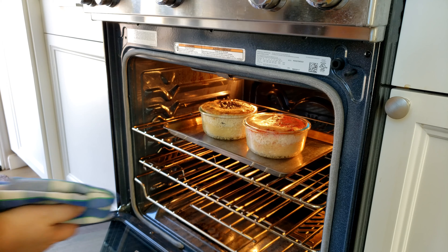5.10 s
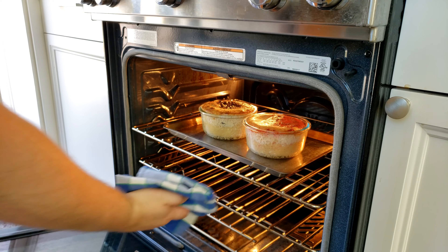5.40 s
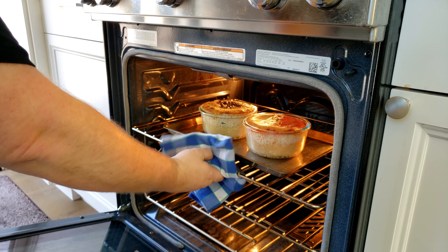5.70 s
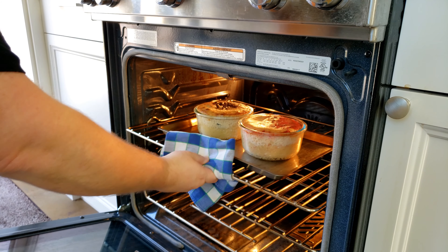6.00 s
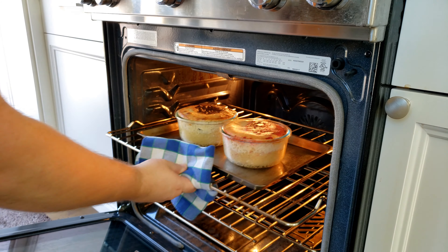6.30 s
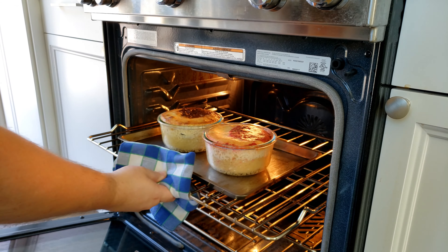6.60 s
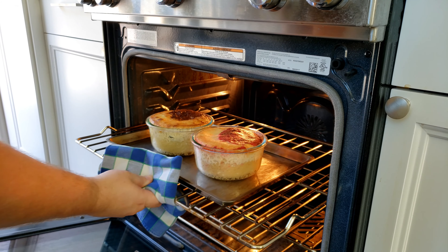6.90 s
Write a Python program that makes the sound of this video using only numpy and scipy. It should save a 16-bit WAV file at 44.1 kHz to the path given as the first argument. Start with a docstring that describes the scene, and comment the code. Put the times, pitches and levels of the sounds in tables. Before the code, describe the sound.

An open oven hums and whirrs quietly throughout in a hard-walled kitchen with a short echo, over a low room rumble and a faint rustle of cloth. From about 0.3 seconds someone walks unevenly on a wooden floor: boards knock, soles slap and the floor thuds, most heavily near 1.1 and 1.9 seconds. Small things tick now and then, and loose metal rattles briefly at 1 second. At 2.75 seconds a hard object is set down with a sharp, hollow clack. More steps follow until about 4.6 seconds, with a few crisp ticks around 3.5. The rumble swells slightly, and a very faint thin whine rises and fades near 5 seconds. From 5.9 seconds the loaded wire rack is drawn out, scraping and ringing along its rails, loudest between 6 and 6.3. The sheet pan squeals briefly at 6.8 seconds, and the scrape eases off just after 7.

```python
"""An open oven hums and whirrs in a bright, hard-walled kitchen, over a low rumble in the room and a
faint rustle of cloth. Someone walks about on the wooden floor: small things tick, boards knock, soles
slap, loose metal rattles and the floor thuds. Near 2.75 s something is set down with a clack. The
rumble swells with the later steps, and a thin whine rises and fades. From 5.86 s a hand draws out the
wire rack, which scrapes along its rails under a sheet pan and two glass dishes; the pan squeals briefly."""
import sys
import numpy as np
from scipy import signal
from scipy.fft import rfft, irfft
from scipy.io import wavfile

SR = 44100
rng = np.random.default_rng(int(sys.argv[2]) if len(sys.argv) > 2 else 0)


def put_to_file(sound):
    """Save the sound as 16-bit audio at rate SR, in the file named by the first command-line argument."""
    columns = np.atleast_2d(sound).T  # one column per channel
    safe = np.clip(columns, -1, 1)
    whole_steps = np.round(safe * 32767)
    wavfile.write(sys.argv[1], SR, whole_steps.astype(np.int16))


N = 315315
TIME = np.arange(N) / SR
FREQ = np.arange(N // 2 + 1) * SR / N + 1e-3
# The borders of the bass, lower middle, upper middle and treble bands, in Hz.
BAND_EDGES = [20, 450, 1200, 4500, 20000]


def undb(db):
    """Turn decibels into a number to multiply by."""
    return 10 ** (np.asarray(db) / 20)


def unit(x):
    """Scale a sound to an average strength (rms) of 1."""
    return x / np.sqrt(np.mean(x ** 2))


def over_time(table):
    """Join rows that start with a time by straight lines: one curve for each further column."""
    times, *columns = np.transpose(table)
    return [np.interp(TIME, times, column) for column in columns]


def over_pitch(points, hz=FREQ):
    """Join (Hz, value) points by straight lines, giving every octave the same room."""
    point_hz, values = np.transpose(points)
    return np.interp(np.log(hz), np.log(point_hz), values)


def shape(x, gain):
    """Filter a sound with one gain for each frequency."""
    return irfft(rfft(x) * gain, N)


def split(x, colour, edges=BAND_EDGES):
    """Give a sound its tone colour and cut it into bands of equal strength."""
    spectrum = rfft(x) * undb(over_pitch(colour))
    bands = [1 / np.sqrt((1 + (lo / FREQ) ** 12) * (1 + (FREQ / hi) ** 12))
             for lo, hi in zip(edges, edges[1:])]
    return [unit(irfft(spectrum * band, N)) for band in bands]


def noise():
    """Two rows of noise: mid (what left and right share) and side (how they differ)."""
    return rng.standard_normal((2, N))


def coloured_noise(colour):
    """Noise with a tone colour given as (Hz, dB) points."""
    return unit(shape(noise(), undb(over_pitch(colour))))


def narrow_noise(hz, width_hz):
    """Noise gathered around one frequency."""
    return unit(shape(noise(), 1 / (1 + ((FREQ - hz) / width_hz) ** 2)))


def grains(per_second, spread_db):
    """A crowd of tiny contacts of uneven size."""
    contacts = noise() * (rng.random(N) < per_second / SR)
    return contacts * undb(spread_db * np.minimum(rng.exponential(size=N), 4))


def wander(rate):
    """A smooth random curve, about 1 in size, that changes about rate times a second."""
    return unit(shape(rng.standard_normal(N), np.exp(-(FREQ / rate) ** 2)))


def add(track, start_s, sound):
    """Mix a short sound into a track."""
    i = max(int(start_s * SR), 0)
    track[..., i:i + sound.shape[-1]] += sound[..., :N - i]


def blows(times, levels_db, fades_s, rise_s):
    """The loudness curve of hits that build up quickly and die away."""
    out, t = np.zeros(N), TIME[:SR // 2]
    for start, db, fade in zip(times, levels_db, fades_s):
        add(out, start, undb(db) * (1 - np.exp(-t / rise_s)) * np.exp(-t / fade))
    return out


def strikes(times, levels_db):
    """Single sharp hits, each reaching the side row a few samples late."""
    out = np.zeros((2, N))
    for start, db in zip(times, levels_db):
        add(out[0], start, undb([db]))
        add(out[1], start + rng.integers(4, 12) / SR, undb([db]))
    return out


def ring(modes):
    """One second of fading tones; a tone's ring time is how long it takes to drop 60 dB."""
    t = TIME[:SR]
    return sum(undb(db) * np.sin(2 * np.pi * hz * t) * np.exp(-np.log(1000) * t / ring_s)
               for hz, db, ring_s in modes)


def resonances(modes):
    """Filter gains for an object that favours certain pitches."""
    return sum(undb(db) / (1 + 1j * (FREQ ** 2 - hz ** 2) / (FREQ * width)) for hz, width, db in modes)


def follow(control_db, slope):
    """A gain that is 1 at a curve's peak and loses slope dB for each dB below it."""
    return undb(slope * (control_db - control_db.max()))


def landings(rows, colour, rise_s, band_db):
    """A shoe lands as a crowd of tiny hits, with its own loudness in each of the four bands."""
    times, level, bass, treble, fades = np.transpose(rows)[:5]
    levels = bass, level, level + 0.55 * treble, level + treble
    bands = split(grains(9000, spread_db=1.2), colour)
    return sum(band * blows(times, db + trim, fades, rise_s)
               for band, db, trim in zip(bands, levels, band_db))


def oven(mains_hz=120, steady_tone=0.68):
    """The oven gives a mains hum, the fan's wavering whirr and a thin hiss."""
    # How loud the hum and the fan are. Each row: time in seconds, level in dB.
    hum_levels = [(0.0, -53.5), (0.84, -62.5), (1.23, -49), (1.43, -56), (5.34, -48), (5.87, -53),
                  (7.15, -45.5)]
    whirr_levels = [(0, -64.5), (.7, -63.5), (1.45, -76), (2.9, -85), (3.9, -61), (4.2, -62.5), (5.62, -56),
                    (5.85, -68)]
    # The fan's note. Each row: time in seconds, pitch in Hz.
    whirr_pitches = [(2.5, 850), (3.9, 900), (4.6, 883.6), (5.3, 821), (6.4, 863)]
    # The hiss's tone colour. Each row: frequency in Hz, level in dB.
    hiss_colour = [(700, -38), (1300, -12), (2000, -16), (4500, -22), (6000, 6), (7500, -8), (9000, -44),
                   (10800, 11), (12300, -3), (14000, -8.5), (16000, -17)]
    mains_phase = 2 * np.pi * mains_hz * TIME
    hum = unit(np.sin(mains_phase) + undb(-15) * np.sin(2 * mains_phase))
    hum *= undb(over_time(hum_levels)[0] + 2 + 1.5 * wander(6))
    flutter = steady_tone + narrow_noise(0, width_hz=41)
    fan_phase = 2 * np.pi * np.cumsum(over_time(whirr_pitches)[0]) / SR
    whirr = unit(flutter * np.sin(fan_phase)) * undb(over_time(whirr_levels)[0])
    hiss = coloured_noise(hiss_colour) * undb(-69.5)
    return hum * np.array([[1], [0.6]]) + whirr + hiss


def room_rumble():
    """A low rumble in the room, which swells with the footsteps around 3.9 to 4.6 s."""
    # How loud the rumble is. Each row: time in seconds, level in dB.
    levels = [(0, -47), (.7, -53.5), (1.45, -53), (2.9, -51), (3.9, -46), (4.6, -45.5), (5.2, -49),
              (7.15, -46.5)]
    # Its tone colour. Each row: frequency in Hz, level in dB.
    colour = [(20, -40), (30, -28), (45, -1.5), (70, -7), (125, -7.5), (160, -14), (200, -22), (290, -17),
              (450, -26), (650, -27.5), (880, -25.5), (1050, -36.5), (1500, -52.5), (3000, -67)]
    return coloured_noise(colour) * undb(over_time(levels)[0] + wander(13))


def cloth():
    """Fibres rub: a faint, flickering rustle with a swish at each larger movement."""
    # The cloth's tone colour. Each row: frequency in Hz, level in dB.
    colour = [(710, 22), (1200, -7), (2110, -11.5), (2830, -11), (3150, -13), (4600, -13), (5710, -6),
              (7020, -3), (8440, -6.5), (15200, 1), (16000, -4.5)]
    # The faint rustle. Each row: time in seconds, level in dB.
    rustle_levels = [(0.0, -52.5), (0.64, -61), (1.0, -58), (1.31, -65), (1.63, -70), (2.62, -59),
                     (4.26, -59), (4.51, -53.5), (5.02, -58), (5.8, -54.5)]
    # The swishes. Each row: start in seconds, treble in dB, middle in dB, seconds to the peak.
    swishes = [(0.74, -64, -56.5, .04), (0.929, -52.5, -67, 0.018), (2.265, -44.5, -56.5, 0.027),
               (2.495, -44.5, -94, 0.023), (2.817, -51, -48.5, 0.033), (3.273, -54.5, -92, 0.041),
               (3.867, -53, -52.5, .042), (4.27, -45, -53.5, 0.048), (4.43, -66, -56, 0.056),
               (4.799, -46.5, -87, 0.016), (5.01, -49.5, -77, 0.015), (5.102, -50, -68, .015),
               (5.332, -49, -71, 0.031), (5.785, -50, -58.5, 0.016)]
    middle, treble = split(grains(7000, spread_db=0.42), colour, BAND_EDGES[2:])
    rustle_db = over_time(rustle_levels)[0] - 2 + 1.46 * wander(33)
    out = (treble + undb(-17) * middle) * undb(rustle_db)
    for start, treble_db, middle_db, peak_s in swishes:
        age = np.maximum(TIME - start, 0) / peak_s
        swell = (age * np.exp(1 - age)) ** 2.3
        out += (undb(treble_db - 6) * treble + undb(middle_db - 6) * middle) * swell
    return out


def ticks():
    """Small things tick with a snap and brief chatter; the smaller, the higher their lowest tone."""
    # The ticks. Each row: start in seconds, snap in dB, chatter in dB, lowest frequency in Hz.
    events = [(0.253, -25, -41.5, 1480), (0.737, -35, -43, 1500), (2.179, -45, -47.5, 1500),
              (2.475, -29, -36.5, 5160), (3.415, -21, -46, 3000), (3.4622, -21, -29.5, 1500),
              (3.5779, -22, -38, 6000)]
    # Their tone colour. Each row: frequency in Hz, level in dB.
    colour = [(800, -40), (2000, -5), (4000, -4.5), (5400, -1), (7500, -1.5), (9000, -3), (12000, 3.5),
              (16000, 1)]
    out, hiss = np.zeros((2, N)), noise()
    for start, snap_db, chatter_db, lowest_hz in events:
        snap = strikes([start], [snap_db + 2])
        chatter = hiss * blows([start], [chatter_db + 2], fades_s=[0.005], rise_s=0.0011)
        low_cut = signal.butter(4, lowest_hz, "highpass", fs=SR, output="sos")
        out += signal.sosfilt(low_cut, snap + chatter)
    return shape(out, undb(over_pitch(colour)))


def board_knocks(ring_s=0.067):
    """Shoes knock dully on the boards, and each board rings briefly at its own pitch."""
    # The knocks. Each row: start in seconds, level in dB, bass in dB, treble in dB above the level,
    # fade in seconds, the board's pitch in Hz.
    knocks = [(0.324, -42, -42, -1, 0.053, 697), (0.34, -29, -40.5, -30, 0.016, 457),
              (0.709, -44.5, -56, -27, 0.021, 245), (0.812, -42.5, -49, 4.5, 0.02, 307),
              (0.911, -27, -31, -27, 0.015, 235), (0.996, -29, -24.5, -12.5, 0.026, 251),
              (1.872, -47, -36.5, -3, 0.072, 285), (1.93, -37, -28.5, -8, 0.037, 330),
              (2.513, -56, -46, 0.5, 0.079, 234), (2.689, -42, -65, -33, 0.028, 231),
              (3.048, -41, -36, -16, 0.034, 240), (3.087, -40.5, -54, -12.5, 0.018, 244),
              (3.41, -38, -41, -17, 0.04, 307), (3.501, -41.5, -43.5, -14.5, 0.079, 440),
              (3.702, -37.5, -37, -18, 0.034, 267), (4.367, -32.5, -49, -19, 0.016, 330.5),
              (4.64, -49, -38.5, -3, 0.025, 354), (5.745, -44.5, -48, -1.5, 0.023, 334)]
    # The boards' tone colour. Each row: frequency in Hz, level in dB.
    colour = [(100, -5), (170, -4.5), (255, 4), (350, -3.5), (450, -11), (700, -14.5), (1000, -18),
              (1400, -25), (1700, -22.5), (2750, -24.5), (3400, -31), (4300, -33), (6000, -37.5),
              (8600, -39.5), (11500, -36.5), (16000, -38)]
    out = landings(knocks, colour, rise_s=0.0043, band_db=(-2.5, -5, -10, -3))
    for start, _, bass_db, _, _, hz in knocks:
        placement = np.array([[1], [rng.uniform(-1.5, 1)]])
        add(out, start, ring([(hz, bass_db + 0.5, ring_s)]) * placement)
    return out


def sole_slaps(flat_lag_s=0.014, edge_fade_s=0.019):
    """A sole slaps down edge first, then flat, and both contacts set the boards ringing."""
    # The slaps. Each row: start in seconds, bass in dB, the edge's level and extra treble in dB,
    # the flat's level and extra treble in dB, the flat's fade in seconds.
    slaps = [(0.36, -49, -38.5, 11.5, -28, -3.5, 0.0083), (1.121, -26.5, -24.5, -5, -27, -31, 0.021),
             (1.922, -31.5, -19, -8.5, -33, -13.5, 0.081)]
    # The sole's tone colour. Each row: frequency in Hz, level in dB.
    colour = [(82, -28), (140, 7), (212, -13.5), (309, -0.5), (377, -5), (572, -0.5), (885, -2),
              (977, -6.5), (1220, -10.5), (1540, -16.5), (2850, -23), (3210, -22), (14500, -15),
              (16000, -24)]
    # The boards' tones. Each row: pitch in Hz, level in dB, ring time in seconds.
    board_tones = [(377, -7, 0.25), (591, -3.5, 0.21), (797, -33, 0.12), (1310, -25, .15)]
    contacts = []
    for start, bass_db, edge_db, edge_treble, flat_db, flat_treble, fade in slaps:
        contacts.append((start, edge_db, bass_db - 3, edge_treble, edge_fade_s))
        contacts.append((start + flat_lag_s, flat_db, bass_db, flat_treble, fade))
    smack = landings(contacts, colour, rise_s=0.0032, band_db=(-2.5, -9, -7, -2))
    times, levels_db = np.transpose(contacts)[:2]
    hits = strikes(times, levels_db - 10)
    return smack + signal.fftconvolve(hits, ring(board_tones)[None], axes=1)[:, :N]


def metal_rattle(start_s=0.99):
    """Loose metal chatters against the stove and settles."""
    # The metal's tones. Each row: pitch in Hz, width in Hz, level in dB.
    metal_tones = [(1210, 83, 0), (1766, 220, -5), (2120, 220, -5), (2680, 240, -2)]
    chatter = unit(shape(grains(4000, spread_db=1), resonances(metal_tones)))
    return chatter * blows([start_s], levels_db=[-42], fades_s=[0.045], rise_s=0.0012)


def floor_bend(db, hz):
    """One push on the floor: down, back, and soon still."""
    cycles = TIME[:SR // 8] * hz
    return -undb(db) * np.sin(2 * np.pi * cycles) * cycles / 0.34 * np.exp(1 - cycles / 0.39)


def floor_thuds(tap_lead_s=0.00583, rebound_s=0.0364):
    """The heel, then the ball of the foot, bends the floor; it springs back and the beams ring on."""
    # The steps. Each row: start in seconds, heel level in dB and pitch in Hz, seconds until the
    # ball lands, ball level in dB and pitch in Hz, hardness of the shoe in dB.
    steps = [(1.138, -31, 71.5, .046, -28.5, 51, -10.5), (1.925, -19, 46.5, .093, -22, 59, -14.5),
             (2.567, -32.5, 54, 0.026, -28, 58, -22), (3.058, -27, 56, .035, -24.5, 92, -3),
             (3.513, -34.5, 90.5, .063, -37.5, 76, -14), (3.712, -30.5, 87.5, 0.051, -33, 56, -17),
             (4.373, -23, 61.7, 0.092, -39, 66.5, -8.5)]
    # The floor's tones. Each row: pitch in Hz, level in dB, ring time in seconds.
    floor_tones = [(46, -3, 0.24), (52.4, -16, 1), (88, -2, 0.69), (111, -12, 0.24), (143, -24, 0.2),
                   (236, 22, 0.23)]
    push = np.zeros(N)
    for start, heel_db, heel_hz, roll_s, ball_db, ball_hz, hard_db in steps:
        for when, db, hz in ((start, heel_db, heel_hz), (start + roll_s, ball_db, ball_hz)):
            # A hard shoe taps just before the weight arrives.
            add(push, when - tap_lead_s, floor_bend(db + hard_db, hz=154.6))
            add(push, when, floor_bend(db, hz))
            add(push, when + rebound_s, floor_bend(db - 10.5, hz=56))
    ringing = signal.fftconvolve(push, ring(floor_tones))[:N] / SR * 50
    mid = undb(4.5) * push + undb(-4) * ringing
    # Long waves reach left and right out of step but almost equally loud.
    side = undb(-2) * signal.hilbert(mid).imag
    return np.array([mid, side])


def clack(tock_hz=850, tock_db=-10.5, tock_ring_s=0.0085, side_db=2.5):
    """A hard thing is set down: a snap, a hollow tock, brief chatter and a faint ring."""
    # An edge touches, then the whole thing lands. Each row: start in seconds, level in dB.
    touches = [(2.7504, -8), (2.7523, 0.5)]
    # Its tone colour. Each row: frequency in Hz, level in dB.
    colour = [(120, -34), (200, -4), (259, -8), (491, -3.5), (777, -5.5), (916, -5.5), (1370, -9.5),
              (2290, -22), (2650, -15), (3490, -27), (5840, -18), (8580, -31.5), (14900, -41), (16000, -53)]
    # Its tones. Each row: pitch in Hz, level in dB, ring time in seconds.
    object_tones = [(510, -3, 0.14), (800, -1, 0.26), (900, -2, .28), (950, -7, 0.26), (1250, 1, 0.28),
                    (1360, -4, 0.23), (1460, -8, .2), (2020, -9, 0.22), (2360, -8, 0.25), (5900, -11, 0.2)]
    times, levels_db = np.transpose(touches)
    hits = strikes(times, levels_db)
    snap = undb(-4) * shape(hits, undb(over_pitch(colour)))
    chatter_level = blows(times, levels_db - 32, fades_s=[0.023] * len(times), rise_s=0.00023)
    tones = undb(-50.5) * ring(object_tones) + ring([(tock_hz, tock_db, tock_ring_s)])
    ringing = signal.fftconvolve(hits, tones[None], axes=1)[:, :N]
    return coloured_noise(colour) * chatter_level + (snap + ringing) * np.array([[1], [undb(side_db)]])


def whine(peak_s=4.83, swell_s=0.75):
    """A thin, unsteady whine swells once above the oven's whirr and fades."""
    swell = np.exp(-((TIME - peak_s) / swell_s) ** 2)
    return narrow_noise(hz=2836, width_hz=38) * undb(-80.5) * swell


def wire_resonances(count=26, low_hz=966, high_hz=4390, width_hz=47):
    """Each of the rack's wires rings at its own pitch, the higher ones more softly."""
    pitches = np.geomspace(low_hz, high_hz, count) * np.exp(0.032 * rng.standard_normal(count))
    return resonances([(hz, width_hz, -6 * np.log(hz / low_hz)) for hz in pitches])


def rack_scrape(song_hz=368):
    """Wire sticks and slips along the rails; the slips ring the rack and pan and shake the oven."""
    # The pull. Each row: time in seconds, scrape in dB (from pressure), hiss in dB (from speed).
    pull = [(5.86, -57, -60), (5.874, -62, -55.5), (5.916, -45.5, -51.5), (6.05, -38, -42),
            (6.154, -39.5, -40), (6.28, -36, -40.5), (6.704, -48, -51), (6.822, -44, -49),
            (7.15, -53.5, -69.5)]
    # The scrape's tone colour. Each row: frequency in Hz, level in dB.
    colour = [(18, -39), (30, -4), (109, 4.5), (259, -7), (295, -9), (364, -0.5), (512, -6), (684, -6),
              (962, -19), (1910, -24), (4650, -30), (7270, -22.5), (8980, -28.5), (14800, -20.5),
              (16000, -33)]
    # The loaded rack's tones. Each row: pitch in Hz, width in Hz, level in dB.
    rack_tones = [(228, 12, 7), (263, 32, 6.5), (337, 16, 2), (371, 28, -3), (430, 20, -6), (600, 9.3, -15),
                  (710, 28, -15), (770, 26, -6), (1170, 14, -20), (1350, 21, -26), (2030, 60, -17.5)]
    scrape_db, hiss_db = over_time(pull)
    slips = grains(6000, spread_db=0.37) * undb(wander(36))
    low, middle, high, top = split(slips, colour, edges=[30, 170, 1200, 4500, 20000])
    rack_ring = unit(shape(slips, resonances(rack_tones)))
    wire_ring = unit(shape(slips, wire_resonances()))
    body = (undb(-4.5) * middle + undb(-10) * rack_ring) * undb(scrape_db)
    rasp = (undb(-47.5) * high + undb(-57.5) * wire_ring) * follow(hiss_db, slope=1.08)
    rumble = low * undb(-44 + 3 * wander(7.8)) * follow(scrape_db, slope=0.65)
    hiss = top * undb(hiss_db - 3)
    # At the height of the pull the slips fall into step and the rack sings.
    pitch = song_hz * (1 + 0.013 * wander(23.3))
    phase = 2 * np.pi * np.cumsum(pitch) / SR
    song_level = undb(-38 + 2 * wander(16)) * follow(scrape_db, slope=2.3)
    song = song_level * np.array([np.sin(phase), 0.39 * np.cos(phase)])
    fade_in = np.clip((TIME - pull[0][0]) / 0.011, 0, 1)
    return (body + rasp + rumble + hiss + song) * fade_in


def pan_squeal(peak_s=6.82, swell_s=0.05):
    """The pan slips on the wires for a moment and rings roughly at one pitch."""
    swell = np.exp(-((TIME - peak_s) / swell_s) ** 2)
    return narrow_noise(hz=1190, width_hz=90) * undb(-55.5) * swell


def kitchen_echo(sound, build_up_s=0.0066):
    """Sound bounces between cabinets and walls; the treble dies first."""
    # How long the room rings. Each row: frequency in Hz, seconds to drop 60 dB.
    ring_times = [(100, 0.92), (300, 0.62), (1000, 0.38), (3000, 0.46), (7000, 0.34), (14000, 0.22)]
    t, response = TIME[:SR], np.zeros((2, SR))
    hz = np.arange(SR // 2 + 1) + 1.0
    spectrum = rfft(rng.standard_normal((2, SR)))
    for band_hz, ring_s in ring_times:
        share = over_pitch([(f, float(f == band_hz)) for f, _ in ring_times], hz)
        response += irfft(spectrum * share, SR) * np.exp(-np.log(1000) * t / ring_s)
    response *= 1 - np.exp(-t / build_up_s)
    response /= np.sqrt(np.sum(response ** 2) / 2)
    return signal.fftconvolve(sound, response, axes=1)[:, :N]


def scene():
    """Mix the sounds and their echo, then turn mid and side into left and right."""
    # Stereo width. Each row: frequency in Hz, gain of the side in dB.
    width = [(60, -12), (110, -15.5), (200, -1.5), (380, -1), (700, 2.5), (1290, 6.5), (2400, 3.5),
             (4400, 3.5), (8000, 2), (15000, 1)]
    # Each pair: a sound, how strongly it echoes in dB.
    sources = [(cloth(), -8), (ticks(), -4), (board_knocks(), -5), (sole_slaps(), -8),
               (metal_rattle(), -7.5), (floor_thuds(), -12.5), (clack(), -11.5),
               (rack_scrape(), -5), (pan_squeal(), -7.5)]
    echo = kitchen_echo(sum(sound * undb(echo_db) for sound, echo_db in sources))
    mid, side = oven() + room_rumble() + whine() + sum(sound for sound, _ in sources) + echo
    side = shape(side, undb(over_pitch(width)))
    return np.array([(mid + side) * undb(0.25), (mid - side) * undb(-0.25)])


def record(dry):
    """Cut the deepest bass, below 27 Hz, and the highest treble, above 16000 Hz."""
    dry = signal.sosfilt(signal.butter(3, 27, "highpass", fs=SR, output="sos"), dry)
    return signal.sosfilt(signal.ellip(10, 0.2, 70, 16000, fs=SR, output="sos"), dry)


dry = scene()
out = record(dry)
put_to_file(out)
```